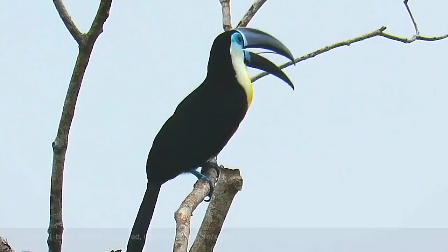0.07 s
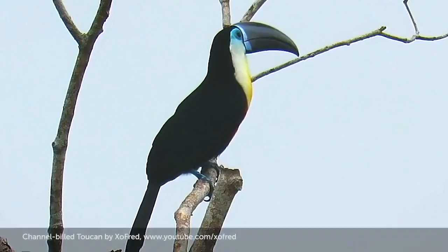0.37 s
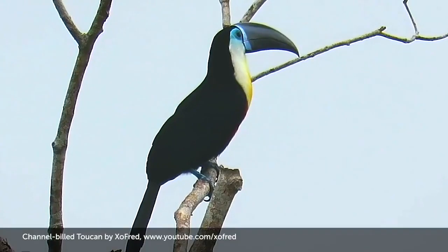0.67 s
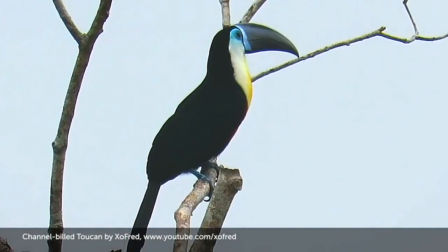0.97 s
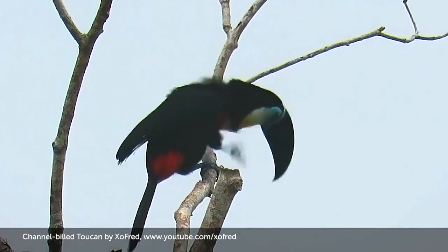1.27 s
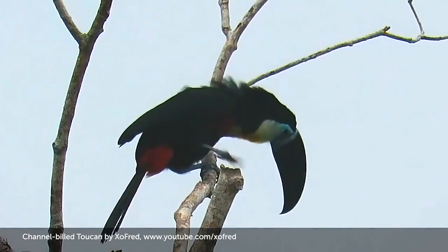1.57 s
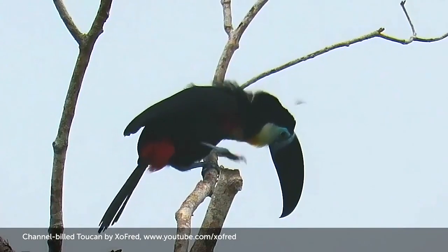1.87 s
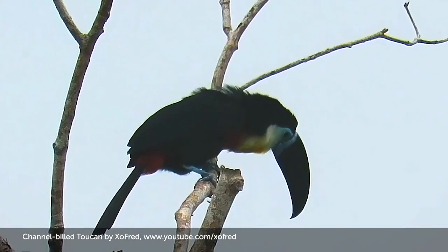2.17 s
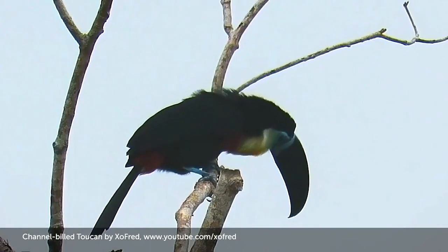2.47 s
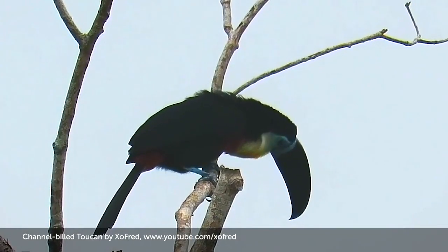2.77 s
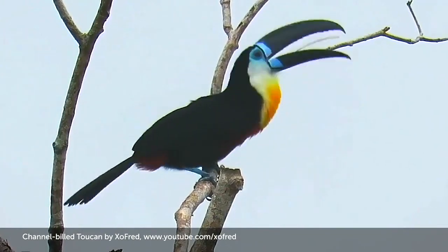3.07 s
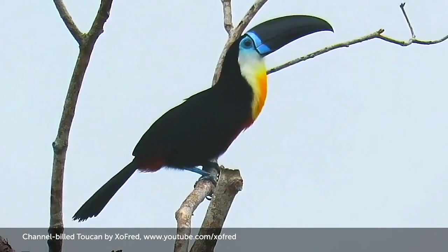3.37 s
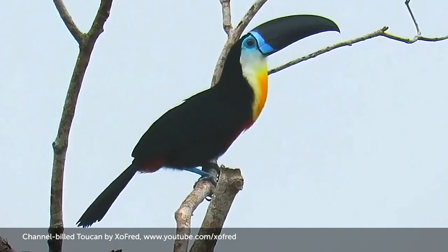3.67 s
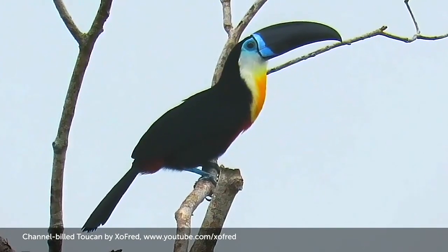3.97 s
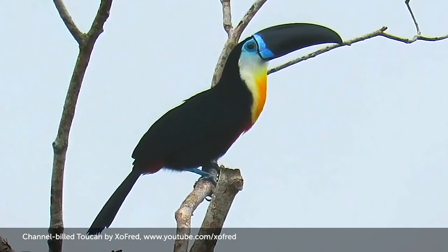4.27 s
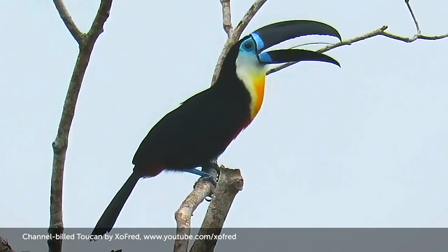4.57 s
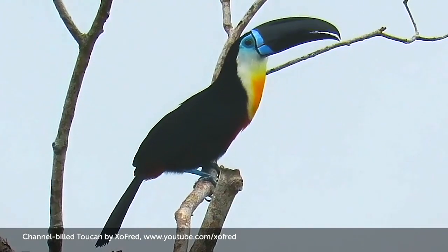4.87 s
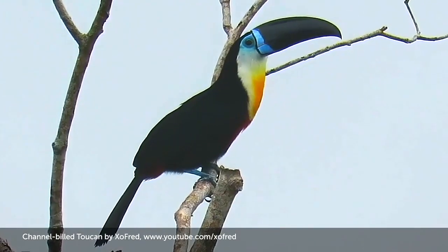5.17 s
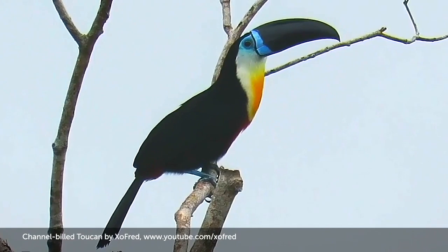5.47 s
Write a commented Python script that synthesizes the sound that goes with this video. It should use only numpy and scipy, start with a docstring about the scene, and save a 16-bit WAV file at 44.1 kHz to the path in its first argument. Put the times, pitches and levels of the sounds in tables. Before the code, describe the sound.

Short, high yelps and croaky rasps from a toucan ring lightly through the trees, a little left of the microphone. Midway the calls pause for a faint shuffle of claws and feathers. Then a second bird gives a few arched whistles, a distant screech passes, and the toucan rasps, yelps and rasps again. A small bird's thin chirps are barely heard now and then, over a steady low rumble and soft hiss.

```python
"""Toucans call among trees, both sides of the syrinx whistling near 2 kHz, chopped by a fast pulse.
They open with rasps, a clear falling yelp and two more rasps; a small bird chirps thinly now and then.
A low hoot throbs under the second yelp, then claws and feathers shuffle on the perch. From 3 s another
bird whistles arched notes, crossed by a rasp and a far screech; a last yelp and rasp close the scene.
Throughout, the trees throw the calls back over a steady distant rumble and hiss."""
import sys
import numpy as np
from scipy import signal
from scipy.fft import rfft, irfft
from scipy.io import wavfile
from scipy.ndimage import uniform_filter1d

SR = 44100
rng = np.random.default_rng(int(sys.argv[2]) if len(sys.argv) > 2 else 0)


def wrap_up_sound(samples):
    """Save the sound to the file named by the first command line argument, as 16-bit audio."""
    columns = np.atleast_2d(samples).T
    # keep every value between -1 and 1, then stretch to whole-number steps
    tamed = np.clip(columns, -1, 1)
    steps = np.round(tamed * 32767).astype(np.int16)
    wavfile.write(sys.argv[1], SR, steps)


N = 242991
TIME = np.arange(N) / SR

# The course of each yelp. Each row: time in seconds, pitch in Hz, level in dB, strain from 0 to 1.
FIRST_YELP = [(.455, 2170, -49, 0.5), (.472, 2154, -42.5, 0), (.479, 1960, -45, .2), (.515, 1926, -35, 0),
              (.538, 1941, -37, 0.23), (.562, 1890, -29, 0.1), (.578, 1863, -36, .3),
              (.603, 1823, -32, 0.34), (.636, 1722, -33, 0.75), (.668, 1515, -56, 0.92)]
SECOND_YELP = [(1.651, 2010, -47, 0.15), (1.668, 2028, -29, 0.024), (1.7, 2055, -32, 0.03),
               (1.742, 2014, -26, .15), (1.755, 1978, -29.5, 0.23), (1.759, 1841, -29.5, 0.42),
               (1.805, 1735, -30.5, 0.44), (1.835, 1620, -37.5, 0.835), (1.858, 1630, -44, 0.85)]
THIRD_YELP = [(4.284, 2180, -56, 0.13), (4.296, 2003, -41, .1), (4.301, 1940, -29.5, .1),
              (4.307, 1858, -34.5, 0.087), (4.325, 1876, -30.5, 0.18), (4.352, 1859, -28.5, .05),
              (4.388, 1830, -29, .1), (4.414, 1798, -29.5, 0.36), (4.458, 1715, -30.5, 0.63),
              (4.487, 1580, -41, 1)]
# Each row: a yelp's course, tail and echo sends in dB, tilt in dB per harmonic, second voice trim in dB.
YELPS = [(FIRST_YELP, -6, -1.04, -1.6, 0.72), (SECOND_YELP, -13, -5.5, 1, -2.3),
         (THIRD_YELP, -10.5, -10.5, 0, -6)]
# The voice under strain. Each row: strain, pulsing, roughness (all 0-1), overtones and second voice in dB.
YELP_VOICE = [(0, 0.35, .015, -5.5, -52.5), (.35, 0.64, 0.07, 0, -37), (.7, 0.75, 0.24, 5, -17),
              (1, 0.82, 0.7, 5, -1)]
# Overtone levels in dB, from the second harmonic up.
YELP_OVERTONES = [-19, -28, -51.5, -44.5]

def yelp(course, *colour):
    """A clear toucan call flicks into pitch, falls ever faster and breaks up as the strain grows."""
    t = np.arange(course[0][0], course[-1][0], 1 / SR)
    hz, db, strain = follow(course, t)
    return syrinx(t, hz, db, colour, follow(YELP_VOICE, strain), YELP_OVERTONES, pulse_hz=105.9,
                  slowing_hz=17, sharpness=0.76, jitter=0.0047, bend=0.04, scatter=0.11, hoarse=0.033)


# Each row: start and length in seconds, pitch ratio to the glide, level in dB, peak as a share of
# the length, swell in dB, tilt in dB per harmonic, second voice trim in dB.
RASPS = [(0, 0.175, 1.01, -41.5, 0.78, 12, 5, -2), (0.167, .11, 0.98, -43.5, 0.99, 6.5, 0, -11),
         (1.016, 0.18, 1.008, -36.5, 0.55, 13, 3, -6), (1.451, 0.22, 0.99, -32.5, 0.55, 13.5, 2.5, 1.5),
         (3.0753, .198, 1, -31.5, 0.55, 15.5, 2.5, 0.5), (4.717, 0.19, 1.003, -33, 0.6, 9.5, 0.5, -3)]
# The glide of every rasp lifts, then sinks. Each row: share of the length, pitch in Hz.
RASP_GLIDE = [(0, 1900), (.17, 2030), (.42, 1965), (.7, 1925), (.86, 1820), (1, 1830)]
# Each row: share of the length, pulsing and roughness from 0 to 1, overtones and second voice in dB.
RASP_VOICE = [(0, 0.6, 0.35, 6.5, -9), (0.19, 0.62, 0.4, -3.5, 0), (0.38, 0.6, 0.24, 0, -18.5),
              (0.64, 0.76, 0.22, 7, -29), (.83, 0.72, 0.4, -1, -13), (1, 0.95, 0.6, 0, -7)]
# Overtone levels in dB, from the second harmonic up.
RASP_OVERTONES = [-27, -36, -49.5]

def rasp(start, length, pitch_ratio, level_db, peak, swell_db, *colour, attack_s=0.0033, fade_db=11.5):
    """A softer toucan call, pulsed throughout: it starts at once, swells and fades."""
    t, share = clock(length)
    hz = pitch_ratio * follow(RASP_GLIDE, share)[0]
    attack_db = -25 * np.maximum(1 - t / attack_s, 0)
    db = level_db + attack_db + arch(share, peak, swell_db, fade_db)
    return syrinx(start + t, hz, db, colour, follow(RASP_VOICE, share), RASP_OVERTONES, pulse_hz=105.06,
                  slowing_hz=18.5, sharpness=2.2, jitter=0.0091, bend=0.097, scatter=0.07, hoarse=0.064)


# The other side of the syrinx sings higher. Each row: share of the call's length, pitch in Hz.
SECOND_VOICE_GLIDE = [(0, 2215), (.22, 2383), (.6, 2298), (1, 2233)]
# Its overtone levels in dB, from the second harmonic up.
SECOND_OVERTONES = [-11, -23.5]

def syrinx(t, hz, db, colour, voice, tones, pulse_hz, slowing_hz, sharpness, jitter, bend, scatter, hoarse):
    """Both sides of a toucan's syrinx whistle near 2 kHz, chopped by one slowing beat."""
    share = np.linspace(0, 1, len(t))
    pulsing, rough, bright_db, second_db = voice
    tilt_db, second_trim_db = colour
    beat_hz = (pulse_hz - slowing_hz * share) * (1 + 0.023 * wander(len(t), 67))
    beats = np.cumsum(beat_hz) / SR

    def side(pitch, partials, beat):
        """One side pulses open; roughness bends and scatters its pitch, phase noise frays the overtones."""
        opening = abs(np.sin(np.pi * beat)) ** (sharpness * (1 + rough))
        flutter = amp(1.1 * wander(len(t), 64) * pulsing)
        gate = unit((1 - pulsing + pulsing * opening) * flutter)
        swing = -bend * rough * np.sin(2 * np.pi * beat) + jitter * wander(len(t), 130)
        grit = scatter * rough * wander(len(t), 330)
        turns = np.cumsum(pitch * (1 + swing + grit)) / SR
        bright = amp(bright_db + 1.94 * wander(len(t), 100))
        upper = overtones(turns + hoarse * wander(len(t), 200), partials, tilt_db)
        return np.sqrt(2) * gate * (np.sin(2 * np.pi * turns) + bright * upper)

    first = side(hz, tones, beats)
    second = side(follow(SECOND_VOICE_GLIDE, share)[0], SECOND_OVERTONES, beats - 0.05)  # pulses lag
    second_gain = amp(second_db + second_trim_db)
    voices = (first + second_gain * second) / np.hypot(1, second_gain)
    return t[0], amp(db) * voices * fade(len(t))


# The EQ of throat and bill. Each row: frequency in Hz, gain in dB.
BILL_EQ = [(1200, -3), (1900, 0), (2400, 0), (3200, -7), (3450, -2), (3750, 2), (4050, -3), (4400, 3),
           (4750, -1), (5100, 2), (5400, -4), (5900, 3), (6700, -4), (8800, -8), (9900, -5), (10350, 7),
           (11000, -5)]

def bill(x):
    """The overtones swell and sink as they slide through the resonances of throat and bill."""
    return irfft(rfft(x) * amp(read(BILL_EQ, np.fft.rfftfreq(N, 1 / SR))), N)


# Each row: start and length in seconds, first, top and last pitch in Hz, top as a share of the length,
# roundness of the arch, then level, swell and fade in dB.
WHISTLES = [(0, 0.068, 960, 967, 830, 0.34, 1.7, -29.5, 7, 2),
            (2.98, 0.101, 855, 1026, 1019, 0.87, 1.3, -25, 21, 2),
            (3.304, 0.073, 784, 1073, 1034, 0.82, 0.99, -23.5, 6.5, 7),
            (3.516, .208, 745, 1045, 903, .3, 1.55, -26, 5.5, 5.5),
            (3.814, 0.18, 705, 843, 689, 0.44, 2.43, -27.5, 10, 10.5)]
# The whistler's resonance. Each row: pitch in Hz, gain in dB.
WHISTLE_RESONANCE = [(700, -9.5), (845, -8), (885, -19), (912, -18), (942, -5.5), (1040, -1.5)]
# Faint overtones of whistle and hoot in dB, from the second harmonic up.
FAINT_OVERTONES = [-42, -51]

def whistle(start, length, first_hz, top_hz, last_hz, top, roundness, level_db, swell_db, fade_db):
    """Pitch and effort rise and fall in one arch; the note leaps out as it reaches its resonance."""
    t, share = clock(length)
    hz = top_hz + arch(share, top, top_hz - first_hz, top_hz - last_hz, roundness)
    db = level_db + arch(share, top, swell_db, fade_db) + read(WHISTLE_RESONANCE, hz)
    return start, tone(hz, db, FAINT_OVERTONES, jitter=0.0035, flutter_db=1.2, ends_s=0.0074)


# Each row: time in seconds, pitch in Hz, level in dB.
HOOT_COURSE = [(1.745, 628, -38.5), (1.789, 623, -44), (1.858, 610, -42.5), (1.895, 598, -37),
               (1.915, 620.4, -33), (1.948, 646, -30), (1.958, 655, -35)]

def hoot(throb_hz=85.6, throb_db=3.5):
    """A low throbbing note sags, then swells as it turns up."""
    start, end = HOOT_COURSE[0][0], HOOT_COURSE[-1][0]
    hz, db = follow(HOOT_COURSE, np.arange(start, end, 1 / SR))
    rate_hz = throb_hz * (1 + 0.086 * wander(len(hz), 40))
    throb = np.sin(2 * np.pi * np.cumsum(rate_hz) / SR)
    track = np.zeros(N)
    add(track, start, tone(hz, db + throb_db * throb, FAINT_OVERTONES, jitter=0.031, flutter_db=2.5))
    return track


# Each row: start and length in seconds, first and last pitch in Hz, level in dB.
BLIPS = [(1.736, 0.016, 900, 833, -40), (1.754, 0.14, 1015, 1060, -52.5), (1.949, 0.013, 995, 950, -42.5),
         (3.982, 0.024, 790, 763, -37)]

def blip(start, length, first_hz, last_hz, level_db):
    """A short unsteady low note beside the hoot or the whistles."""
    t, share = clock(length)
    hz = first_hz + (last_hz - first_hz) * share
    return start, tone(hz, level_db, [], jitter=0.02, flutter_db=5.0)


# Throat resonances. Each row: centre and width in Hz, relative level in dB.
SCREECH_THROAT = [(2520, 130, 8.5), (2790, 110, 4.5), (3083, 150, 3.5), (3200, 170, 4.5), (3396, 80, 9),
                  (3454, 70, 9.5)]

def screech(peak_s=3.16, peak_db=-39.5, rise_db_per_s=198.5, fall_db_per_s=197):
    """A harsh far call: noise in six throat resonances swells and dies."""
    since = TIME - peak_s
    level_db = peak_db + np.minimum(rise_db_per_s * since, -fall_db_per_s * since)
    return amp(level_db) * unit(sum(amp(db) * band(hz, width) for hz, width, db in SCREECH_THROAT))


# Each row: start and length in seconds, first and last pitch in Hz, level in dB.
CHIRPS = [(0.112, 0.073, 6300, 7520, -56), (1.282, 0.042, 8040, 7460, -63.5),
          (1.882, 0.049, 7700, 6500, -62), (3.664, 0.073, 8440, 7500, -66),
          (3.823, 0.06, 7500, 6550, -64.5)]

def chirp(start, length, first_hz, last_hz, level_db, ends_db=7):
    """A small bird's thin straight slide, softer at its ends."""
    t, share = clock(length)
    hz = first_hz + (last_hz - first_hz) * share
    db = level_db + arch(share, 0.98, ends_db, ends_db)
    return start, tone(hz, db, [], jitter=0.016, flutter_db=0.5)


# Each row: start in seconds, relative level in dB.
PERCH_TICKS = [(2.3158, -47), (2.384, -42), (2.4645, -47), (2.7206, -46.5), (2.8853, -48.5)]

def perch(rustle_s=2.71, rustle_db=-63.5, rustle_half_s=0.08, tick_decay_s=0.004, tick_trim_db=-8):
    """Plumage rustles; claws and feathers tick dryly as the bird shifts its grip."""
    swell = np.exp(-((TIME - rustle_s) / rustle_half_s) ** 2)
    track = amp(rustle_db) * band(2900, 1800) * swell
    grit = band(3400, 1500)
    decay = np.exp(-np.arange(2048) / SR / tick_decay_s)
    for start, db in PERCH_TICKS:
        burst = grit[round(start * SR):][:len(decay)]
        add(track, start, amp(db + tick_trim_db) * burst * decay)
    return track


# The forest reverb. Each row: frequency in Hz, time to fall 60 dB in seconds, relative level in dB.
FOREST_TAIL = [(200, 1.2, 6.5), (900, 1.73, -0.5), (1620, 2.76, -8.5), (2020, 1.23, 3), (3300, 1.5, 4.5),
               (3680, 1.15, 4), (4300, 0.76, 8), (8000, 0.75, 1.5)]
# Near reflections. Each row: delay in seconds, left and right level in dB.
NEAR_ECHOES = [(0.021, -7.5, -29.5), (.034, -10, -9), (0.049, -11, -9), (0.111, -17.5, -14.5)]

def trees(x, tail_db, echo_db, spread=0.22, build_s=0.02):
    """Direct sound, a few near reflections and a diffuse tail from trunks and leaves."""
    taps = rng.choice([-1., 1.], (2, SR)) * (rng.random((2, SR)) < 2000 / SR)  # about 2000 a second
    hz, t, spectra = signal.stft(taps, SR, nperseg=256)
    t60, level_db = follow(FOREST_TAIL, hz[:, None])
    build_up = 1 - np.exp(-(t / build_s) ** 2)
    spectra *= amp(level_db - 60 * t / t60) * build_up
    mid, side = signal.istft(spectra, SR, nperseg=256)[1]
    response = amp(tail_db) * np.array([mid + spread * side, mid - spread * side]) / np.linalg.norm(mid)
    response[:, 0] += 1  # the direct sound
    for delay, left_db, right_db in NEAR_ECHOES:
        response[:, round(delay * SR)] += amp(echo_db) * amp([left_db, right_db])
    return signal.fftconvolve(x[None], response, axes=1)[:, :N]


# Stereo width. Each row: frequency in Hz, side against mid in dB.
BED_WIDTH = [(60, -42), (99, -23.5), (160, -16.5), (270, -6), (440, 0), (720, -3.5), (1180, -2.5),
             (1930, -1.5), (3170, 0.5), (5200, -2.5), (8540, 2), (14000, 2)]

def noise_bed(spectrum, patchy_db):
    """Noise with drifting patches; the bass is alike in both ears, the treble wide."""
    frames, hz = N // 512 + 5, np.fft.rfftfreq(2048, 1 / SR)
    mid_re, mid_im, side_re, side_im, patches = rng.standard_normal((frames, len(hz), 5)).T
    patches = unit(uniform_filter1d(uniform_filter1d(patches, 16, 0), 8, 1))
    width = amp(read(BED_WIDTH, hz))[:, None]
    spectra = np.array([mid_re + 1j * mid_im, (side_re + 1j * side_im) * width])
    spectra *= amp(read(spectrum, hz)[:, None] + patchy_db * patches)
    mid, side = signal.istft(spectra, nperseg=2048, noverlap=1536)[1][:, :N]
    return np.array([mid + side, mid - side]) / np.std(mid)


# The colours of rumble and air. Each row: frequency in Hz, relative level in dB.
RUMBLE_EQ = [(15, -48), (25, -40.5), (30, -19), (41, -25.5), (70, 2), (97, 0), (161, -2.5), (184, 1.5),
             (237, -1.5), (353, -10), (450, -11.5), (580, -37), (990, -120)]
AIR_EQ = [(240, -27), (400, -2), (663, 0), (781, -3), (991, -5.5), (1300, -9.5), (1440, -10), (1640, -9.5),
          (1960, -13.5), (2180, -16), (4010, -22.5), (4730, -19), (6360, -27.5), (12200, -38), (14000, -48)]
# The drone's fader moves. Each row: time in seconds, level in dB.
DRONE_FADER = [(.1, -46.5), (1.0, -41.5), (1.35, -56), (1.7, -44.5), (2.2, -47.5), (3.2, -59.5),
               (5.5, -49.5)]
# Faint bands in the far hiss. Each row: centre and width in Hz, level in dB.
HISS_BANDS = [(4624, 170, -73.5), (5670, 240, -80.5), (7190, 320, -79)]

def distance(rumble_db=-43.5, air_db=-52.5, settle_s=1):
    """Far rumble and air start louder and settle; a low drone comes and goes under a faint hiss."""
    early = 1 / (1 + (TIME / settle_s) ** 4)
    rumble = amp(rumble_db + 3 * early) * noise_bed(RUMBLE_EQ, patchy_db=0.5)
    air = amp(air_db + 4 * early) * noise_bed(AIR_EQ, patchy_db=2.06)
    drone = amp(follow(DRONE_FADER, TIME)[0]) * band(hz=152.3, width=47)
    hiss = sum(amp(db) * band(hz, width) for hz, width, db in HISS_BANDS)
    return rumble + air + drone + hiss


def tone(hz, db, tones, jitter, flutter_db, ends_s=0.005):
    """A nearly pure gliding note with rounded ends."""
    turns = np.cumsum(hz * (1 + jitter * wander(len(hz), 78))) / SR
    note = unit(np.sin(2 * np.pi * turns) + overtones(turns, tones))
    return amp(db + flutter_db * wander(len(hz), 58)) * note * fade(len(hz), ends_s) ** 2


def overtones(turns, tones, tilt_db=0):
    """The harmonics above a sine of the same phase, tilted by so many dB per harmonic."""
    return sum(amp(db + tilt_db * (k - 0.5)) * np.sin(2 * np.pi * k * turns)
               for k, db in enumerate(tones, 2))


def band(hz, width):
    """Noise in one steep resonance."""
    f = np.fft.rfftfreq(N, 1 / SR)
    return unit(irfft(rfft(rng.standard_normal(N)) / (1 + (2 * (f - hz) / width) ** 2), N))


def wander(size, hz):
    """A random wobble of rms about 1, up to about hz."""
    f = np.fft.rfftfreq(SR, 1 / SR)
    return unit(irfft(rfft(rng.standard_normal(SR)) / (1 + (f / hz) ** 4), SR))[:size]


def arch(share, top, before, after, power=2):
    """Zero at the share top; lower by before at the start and by after at the end."""
    top = np.clip(top, .02, .98)
    rise = np.maximum(1 - share / top, 0) ** power
    fall = np.maximum((share - top) / (1 - top), 0) ** power
    return -before * rise - after * fall


def fade(size, seconds=0.0026):
    """Soft ends."""
    edge = np.minimum(np.arange(size), np.arange(size)[::-1])
    return np.sin(np.pi / 2 * np.minimum(edge / (seconds * SR), 1))


def clock(length):
    """Seconds since a call began, and the share of its length gone by."""
    t = np.arange(0, length, 1 / SR)
    return t, t / length


def follow(rows, t):
    """The columns of a table, joined by straight lines along its first column."""
    knots, *columns = np.transpose(rows)
    return [np.interp(t, knots, column) for column in columns]


def read(points, hz):
    """An EQ curve joined by straight lines on a log-frequency axis."""
    f, value = np.transpose(points)
    return np.interp(np.log(hz + 1), np.log(f + 1), value)


def amp(db):
    """Decibels to gain."""
    return 10 ** (np.asarray(db) / 20)


def unit(x):
    """Scaled to rms 1."""
    return x / np.sqrt(np.mean(x ** 2) + 1e-20)


def add(mix, start, sound):
    """Mixes a sound in at start seconds."""
    part = mix[max(round(start * SR), 0):][:len(sound)]
    part += sound[:len(part)]


def calls(voice, rows):
    """One track with a call for each row."""
    track = np.zeros(N)
    for row in rows:
        add(track, *voice(*row))
    return track


def scene():
    """Every caller stands among the same trees, over the steady background."""
    yelps = sum(trees(bill(calls(yelp, [(course, *colour)])), tail_db, echo_db)
                for course, tail_db, echo_db, *colour in YELPS)
    birds = amp(-1.5) * yelps * amp([[.2], [-.2]])  # a touch to the left
    lean_left = amp([[.3], [-.3]])
    birds += amp(-2.5) * trees(bill(calls(rasp, RASPS)), tail_db=-11.5, echo_db=-3) * lean_left
    birds += trees(calls(whistle, WHISTLES), tail_db=-12.5, echo_db=-3.5) * lean_left
    birds += amp(-4.0) * trees(hoot() + calls(blip, BLIPS), tail_db=-27.0, echo_db=-28)
    birds += amp(-5.5) * trees(calls(chirp, CHIRPS), tail_db=-4.5, echo_db=-4)
    birds += amp(-4.5) * trees(screech(), tail_db=-2.0, echo_db=-14.5)
    return birds + distance() + perch()


def record(dry, start_s=0.115, rise_s=0.002, low_hz=42, high_hz=14000):
    """The microphone sheds the deepest bass; the sound cuts in abruptly; the top treble is rolled off."""
    low_cut = signal.butter(4, low_hz, "highpass", fs=SR, output="sos")
    high_cut = signal.firwin(511, high_hz, window=("kaiser", 9), fs=SR)
    fade_in = np.clip((TIME - start_s) / rise_s, 0, 1)
    return signal.oaconvolve(signal.sosfilt(low_cut, dry) * fade_in, high_cut[None], "same")


dry = scene()
out = record(dry)
wrap_up_sound(out)
```